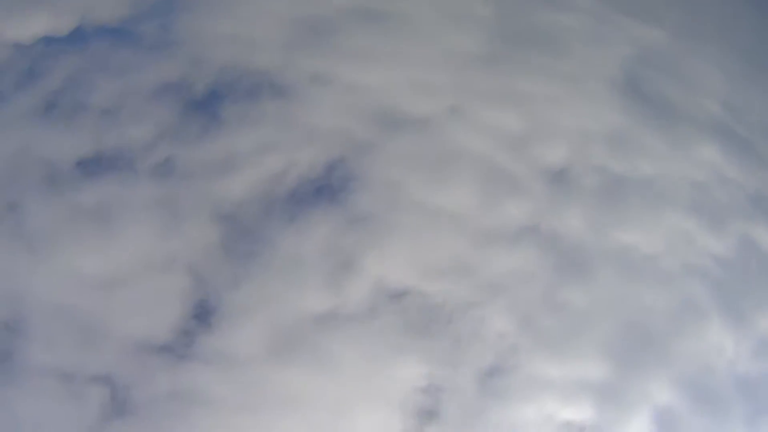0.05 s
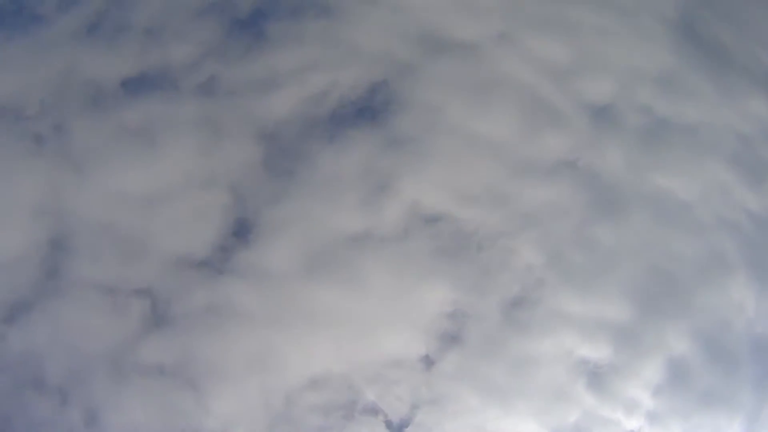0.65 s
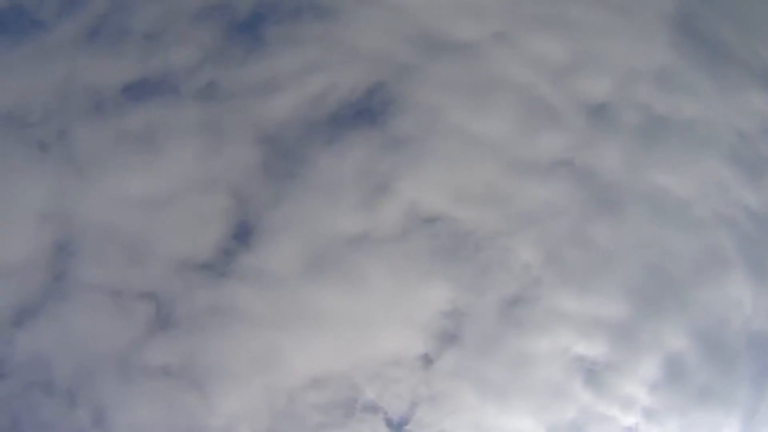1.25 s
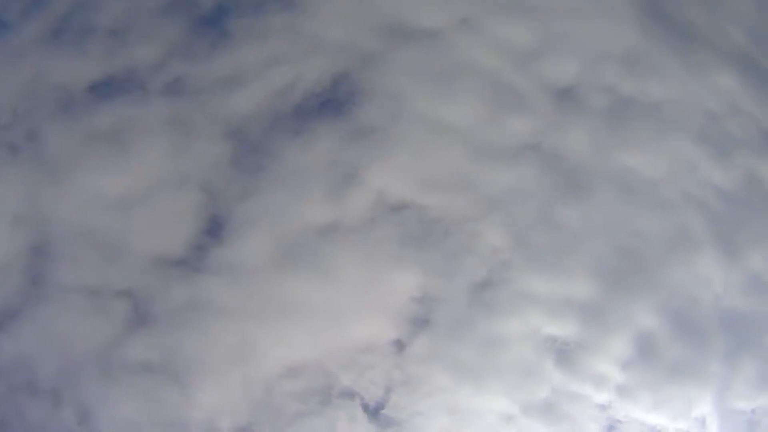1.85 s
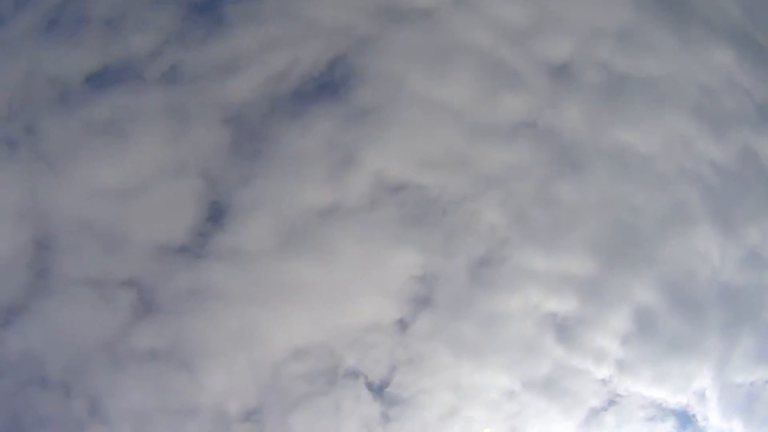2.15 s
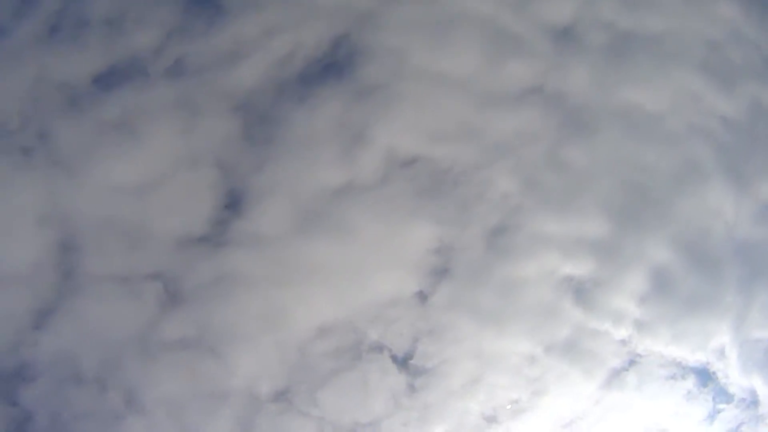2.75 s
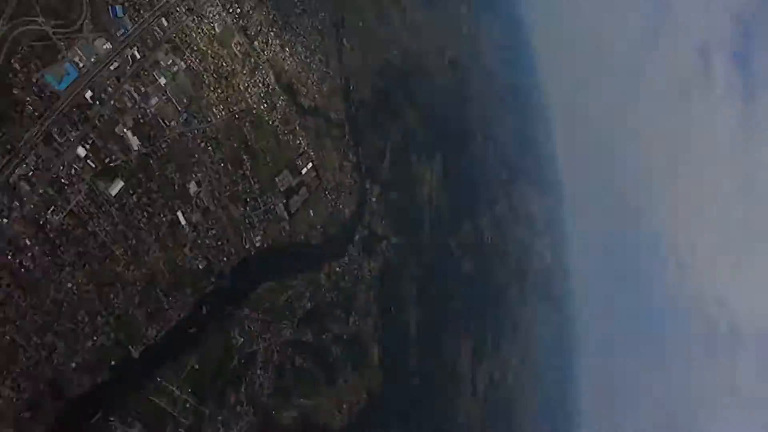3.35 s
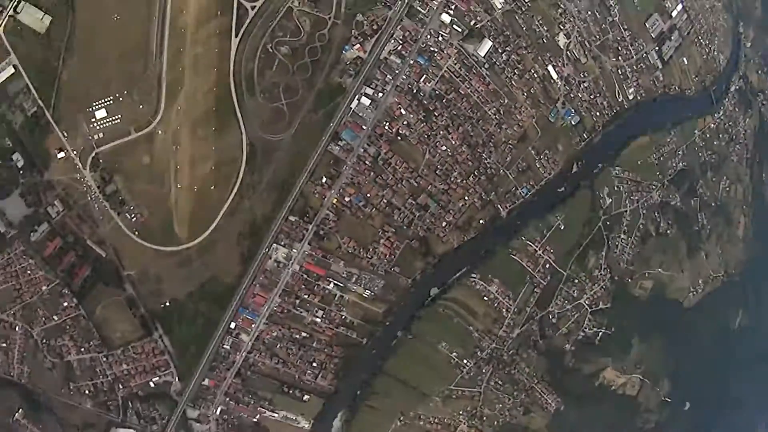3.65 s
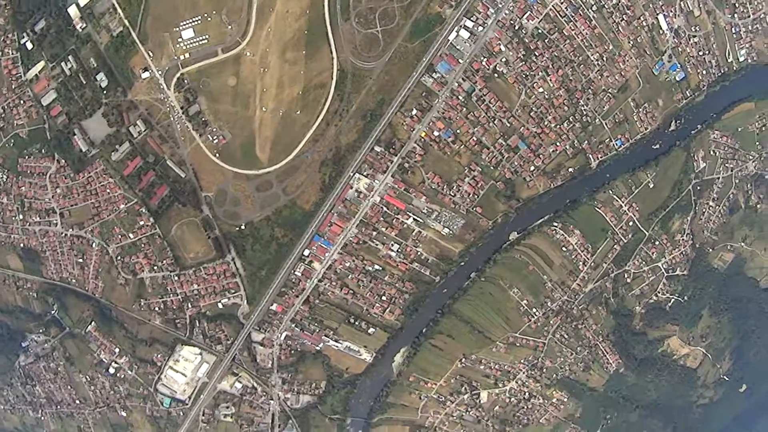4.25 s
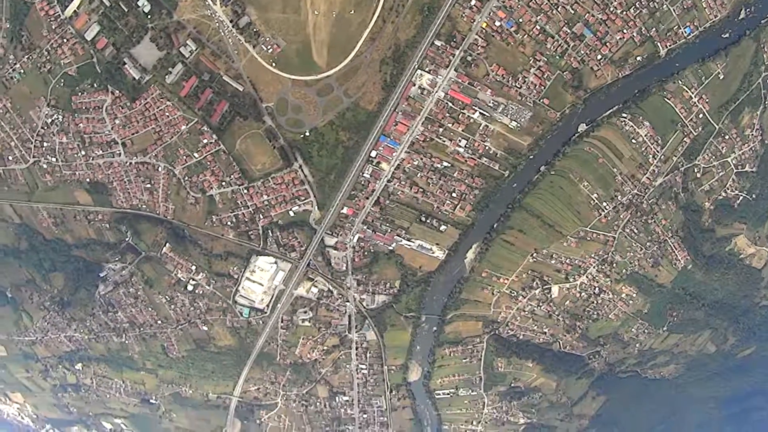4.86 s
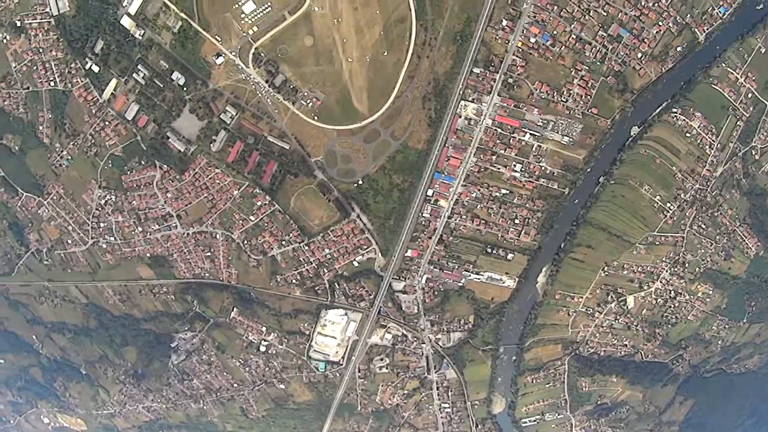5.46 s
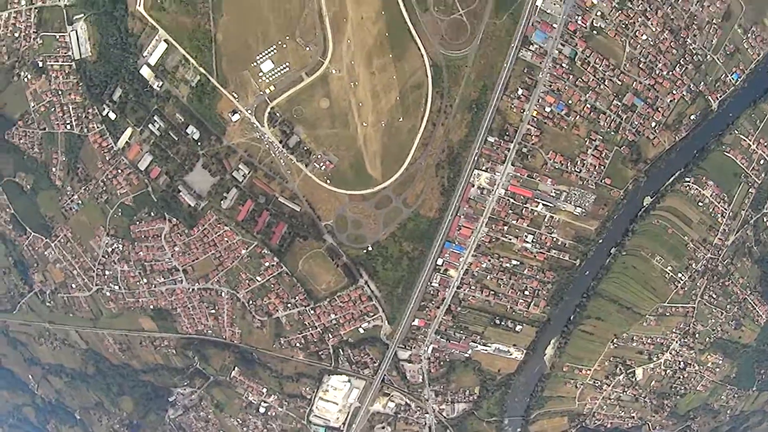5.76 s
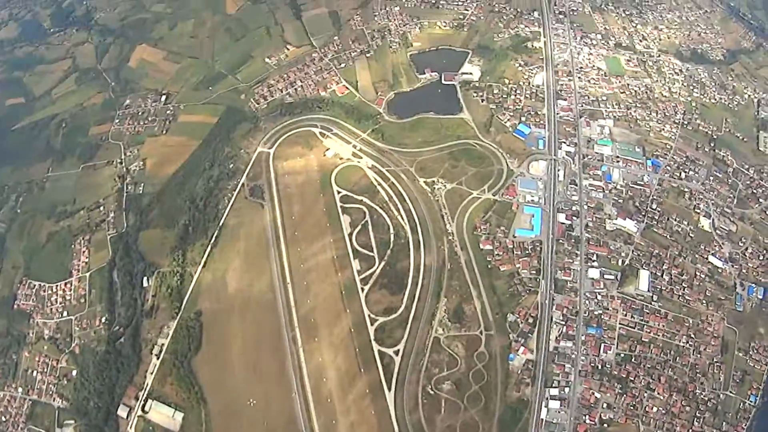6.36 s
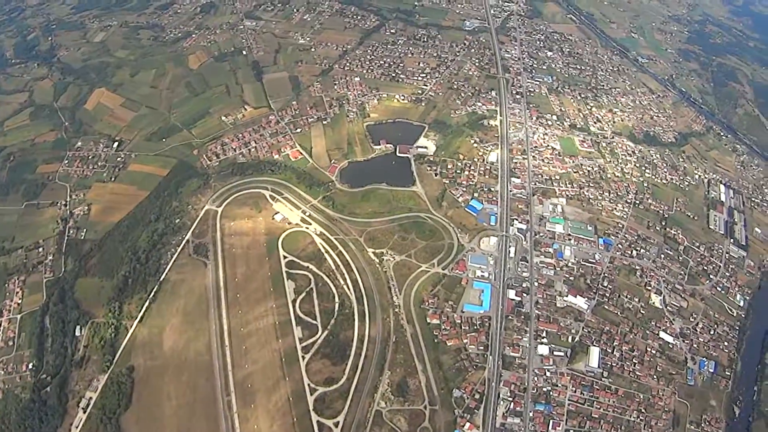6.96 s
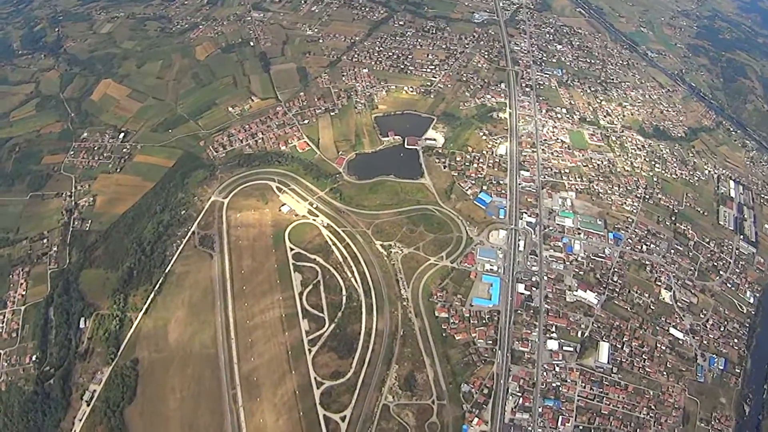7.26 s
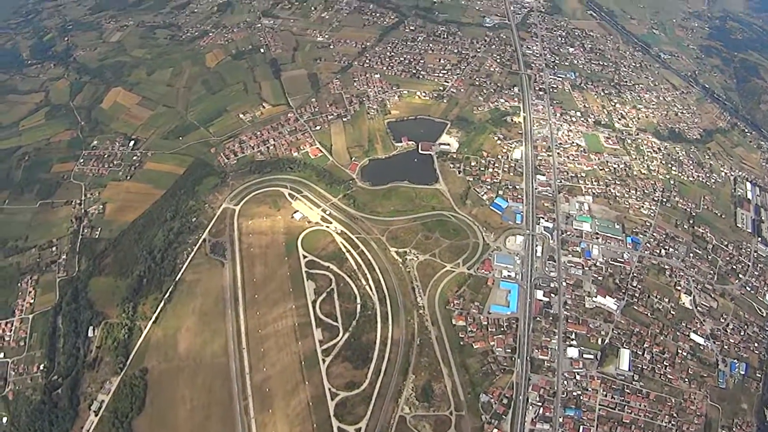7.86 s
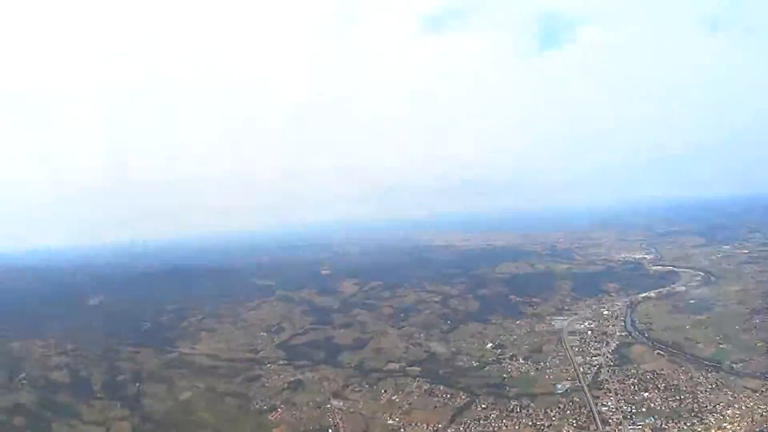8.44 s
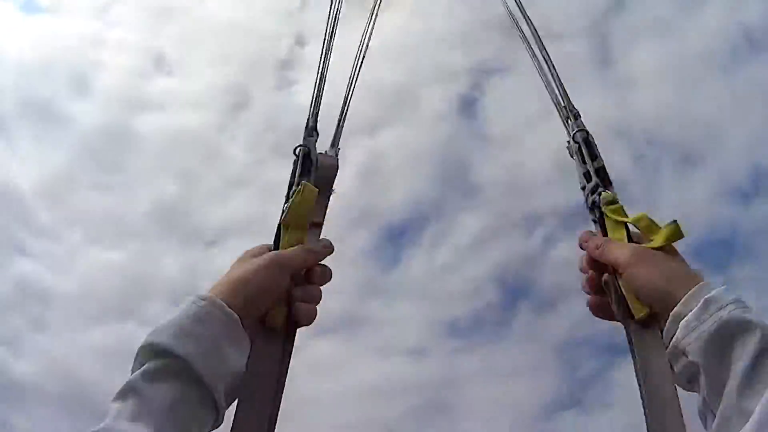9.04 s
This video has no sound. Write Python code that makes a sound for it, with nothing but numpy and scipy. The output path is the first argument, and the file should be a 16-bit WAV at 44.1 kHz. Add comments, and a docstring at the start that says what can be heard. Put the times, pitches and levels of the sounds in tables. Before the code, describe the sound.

Heard from a skydiver's helmet, loud turbulent air rushes past with a steady, airy whistling tone, like breath across a small bottle. A clearer, shrill whistle comes and goes over the roar, strongest at first. After a long stretch of falling, a low surge and a quick cluster of close cracks and thumps mark the parachute opening, and the wind eases into softer, uneven gusts.

```python
"""A shrill whistle over roaring wind: freefall, heard from a camera microphone on the helmet.
Turbulent air roars and hisses over the housing and blows its cavity like a bottle; at times the jet locks
onto an edge in a whistle or a low howl. Then the parachute opens: the hiss dies away, a few hard eddies
slap the microphone point-blank, and a slower, lumpy wind is left."""
import sys
import numpy as np
from scipy import signal
from scipy.fft import rfft, irfft, next_fast_len
from scipy.io import wavfile
from scipy.ndimage import uniform_filter1d

SR = 44100
rng = np.random.default_rng(int(sys.argv[2]) if len(sys.argv) > 2 else 0)


def file_out(sig):
    """Save sig as 16-bit WAV at sys.argv[1]."""
    # one column per channel
    cols = np.atleast_2d(sig).T
    # limit, then scale
    lim = np.clip(cols, -1, 1)
    pcm = np.round(lim * 32767).astype(np.int16)
    wavfile.write(sys.argv[1], SR, pcm)


N = 401300
TIME = np.arange(N) / SR

# Colours of the wind at the microphone. Each row: frequency in Hz, relative density in dB.
BUFFET_COLOUR = [(15, -30), (30, -12), (50, -2), (80, 1), (120, -3.5), (200, -1), (330, -21), (700, -46)]
ROAR_COLOUR = [(100, -23), (200, -1.5), (350, -1.5), (520, 1), (585, -2), (685, 2), (790, -2), (900, -1),
               (1020, 0.5), (1150, -1), (1500, 0.5), (2100, -19), (3500, -18.5), (8000, -43)]
RUSH_COLOUR = [(1300, -15.5), (1850, 5.5), (2150, 2), (2600, 3), (2900, 0), (3250, 0), (3550, -8),
               (3850, -21), (4250, -9), (5000, -18.5), (6500, -32)]
HISS_COLOUR = [(2200, -25.5), (3200, 9), (3800, 0.5), (4230, 6.5), (5100, 3), (5500, 3), (5880, 3),
               (6400, 0.5), (7000, -2), (7600, -1), (8600, -6.5), (9950, -6), (10500, -17), (11200, -36)]
CAVITY_COLOUR = [(1100, -35), (1300, -16.5), (1400, -9), (1490, -2.5), (1600, -1), (1690, 3.5),
                 (1790, -6.5), (1880, -4), (2000, -10.5), (2150, -19.5), (2900, -49)]
# How alike the two microphone ports sound. Each row: frequency in Hz, coherence from 0 to 1.
PORT_LIKENESS = [(30, .92), (90, .9), (250, .72), (430, .8), (700, .6), (1100, .58), (1900, .6),
                 (2400, .38), (3300, .4), (4000, .2), (5500, .5), (7000, .5), (10000, .48)]
# Phase between the ports. Each row: frequency in Hz, lead of the left in radians (negative is late).
PORT_LEAD = [(30, -.12), (90, -.2), (260, -1.3), (450, -1.35), (700, -.9), (1080, -1.7), (1500, -.6),
             (2100, -.6), (2700, -1.8), (3800, -2.4), (5200, -.5), (6500, -1.6), (10000, -1.5)]
# Balance of the ports. Each row: frequency in Hz, left minus right in dB.
PORT_BALANCE = [(60, 2), (89, -0.5), (130, -0.5), (200, -1), (300, -2), (440, 3), (660, 0.0), (980, 0.5),
                (1460, 1.5), (2180, 5), (3250, 2.0), (4850, -0.5), (7220, -1.5), (10800, -2.5)]
# The canopy brakes the fall in two steps. Each row: time in seconds, share of full falling speed.
AIRSPEED = [(8.0, 0.99), (8.12, 0.65), (8.36, 0.52), (8.47, 0.33), (9.1, 0.32)]
# Where the head points. Each row: time in seconds, tilt (0 skyward, about 0.6 groundward, 1 ahead).
HEAD_TILT = [(0, 0.021), (2.2, 0.062), (2.4, 0.35), (3.3, 0.24), (3.55, 0.57), (4.3, 0.63), (5.1, 0.61),
             (6.0, 0.71), (6.4, 1), (7.95, 0.93), (8.15, 0.42), (8.5, 0.046)]
# The microphone in the wake of helmet and body. Each row: time in seconds, depth (0 clean, 1 churned).
BODY_WAKE = [(.15, .07), (1.35, 0.33), (3.05, 0.19), (3.13, 0.13), (3.23, 0.55), (3.47, 0.51),
             (3.57, 0.075), (4.05, 0.024), (5.25, 0.42), (5.8, 0.34), (5.99, .06), (6.3, 0.57),
             (7.86, 0.55), (7.93, 0.88), (8.2, 0.71), (8.44, 1), (8.66, .98), (8.72, 0.63)]
# Spells of rougher air. Each row: start and length in seconds, then lifts in dB of roar, rush, hiss
# and lower hollow.
ROUGH_AIR = [(2.47, 0.64, 5.5, 1, 0.5, -5), (3.189, .09, -3.5, 6.5, -0.5, 4), (3.24, .2, -1, 1.5, 1, -2),
             (3.39, 0.18, 3, 2.5, 0.5, 4.5), (5.65, 0.53, 0.5, 1, 3, -1), (8.06, 0.34, 12.5, -5, 0.5, 12),
             (8.413, 0.23, 3, -2.5, 0, 5.5), (8.592, .08, 3.5, 4, 6, 1)]
# Short gusts while the canopy fills and flies. Each row: time in seconds, lift in dB.
CANOPY_GUSTS = [(8.387, 4.5), (8.411, 7), (8.503, 4), (8.526, -1), (8.755, 6), (8.842, 8.5), (8.875, 5.5),
                (8.982, 3), (9.058, 4.5)]
# Whistles right at the housing. Each row: start, attack, hold and release in seconds, first and last
# pitch in Hz, relative level in dB, left minus right in dB.
EDGE_WHISTLES = [(-.08, .12, 0.23, 0.065, 1830, 1800, -11.5, 2),
                 (.27, 0.045, 0.055, 0.35, 1800, 1765, -13.5, 5),
                 (0.678, 0.054, 0.083, .12, 1745, 1800, -21, 3.5),
                 (.92, 0.11, 0.1135, 0.12, 1785, 1650, -23.5, 6),
                 (1.68, .14, 0.19, 0.26, 1745, 1688, -22.5, 3),
                 (3.007, 0.1, .035, 0.057, 1818, 2034, -10, 8),
                 (3.798, 0.14, 0.12, 0.15, 1499, 1469, -22.5, 2),
                 (5.799, 0.14, 0.11, 0.14, 1623, 1590, -22.5, 2)]
# A lower edge tone. Each row: time in seconds, pitch in Hz, relative level in dB.
EDGE_HOWL = [(2.52, 718, -31), (2.545, 700, -26.5), (2.86, 651, -25), (2.9, 674, -24.5),
             (2.965, 683, -21.5), (2.99, 690, -37)]
# Cloth snaps and hard eddies as the canopy opens. Each row: start in seconds, crack level in dB, pitch
# in Hz, rise in seconds, share of grit, pressure push in dB, push time constant in seconds.
OPENING_SLAPS = [(8.286, -24, 7300, .0004, .5, -40, .001), (8.472, -17, 1500, .0006, .3, -28, .001),
                 (8.55, -16, 1600, .0008, .2, -24, .001), (8.5766, -8, 1350, .0004, .3, -32, .001),
                 (8.598, -12.5, 2900, .0006, .8, -8, .0021), (8.6285, -13, 1700, .0014, .3, -26, .002),
                 (8.6345, -21, 1800, .0009, .8, -10, .0016), (8.6574, -13, 3150, .0008, .7, -8, .0026)]


def wind(whistling, rush_lift_db=0.5, hiss_dip_db=1.5):
    """Turbulent air right on the microphone, bass to treble; the hiss dips under a strong whistle."""
    roar_surge, rush_surge, hiss_surge, hollow_surge = surges()
    rush_lift, hiss_dip = amp(rush_lift_db * whistling), amp(-hiss_dip_db * whistling)
    eddies = churn()
    buffet = blown(level_db=-48.5, wake_db=23, braking_db=-0.5) * turbulence(BUFFET_COLOUR, patchy_db=2)
    roar = blown(level_db=-28.5, wake_db=1, braking_db=5.5)
    roar = roar * roar_surge * turbulence(ROAR_COLOUR, patchy_db=1.5)
    rush = blown(level_db=-26.5, wake_db=-1.5, braking_db=7, facing_db=6, best_tilt=0.96, spread=0.45)
    rush = rush * rush_surge * rush_lift * turbulence(RUSH_COLOUR, patchy_db=0.96)
    hiss = blown(level_db=-31, wake_db=-1, braking_db=13, facing_db=5, best_tilt=0, spread=0.58)
    hiss = hiss * hiss_surge * hiss_dip * turbulence(HISS_COLOUR, patchy_db=0.76)
    ringing = hollows(hollow_surge) + cavity(hiss_dip)
    return buffet + (roar + rush + hiss) * eddies + ringing * eddies ** 0.7


def cavity(overtone_gain, overtone_hz=5010, sag_hz=200):
    """The cavity both ports share, blown at its quarter-wave pitch and near three times that."""
    ring = blown(level_db=-17.5, wake_db=-6.5, braking_db=4, facing_db=4, best_tilt=0.85, spread=0.44)
    ring = ring * turbulence(CAVITY_COLOUR, patchy_db=0.5, likeness=[(1500, 0.97), (2100, 0.95)],
                             lead=[(1400, -0.72), (1900, -0.16)])
    overtone = blown(level_db=-28.5, wake_db=-1, braking_db=11, facing_db=1.5, best_tilt=0, spread=0.19)
    pitch_hz = overtone_hz - sag_hz * over_time(HEAD_TILT)[0]
    return ring + overtone * overtone_gain * resonance(pitch_hz, width_hz=247, left_db=1, lag=0.2)


def whistle(start, attack, hold, release, first_hz, last_hz, level_db, left_db, fade_db=11):
    """The jet catches an edge close by: the whistle swells, holds and fades as its pitch glides."""
    times = start + np.cumsum([0, attack, hold, release])
    pitch_hz = np.interp(times, [times[0], times[-1]], [first_hz, last_hz])
    ends_db = level_db - fade_db
    rows = list(zip(times, pitch_hz, [ends_db, level_db, level_db, ends_db]))
    return edge_tone(rows, jitter_hz=35.6, shake_db=0.7, lock_db=-20.5,
                     gain_db=1.1, left_db=left_db, lag=0.66)


def edge_tone(rows, jitter_hz, shake_db, lock_db, gain_db, left_db, lag):
    """A jet oscillating at an edge: nearly a sine when strong, ragged when it barely locks."""
    pitch_hz, level_db = over_time(rows)
    loose = 1 / (1 + amp(level_db - lock_db) ** 2)
    turns = np.cumsum(pitch_hz + jitter_hz * (0.1 + loose) * wander(rate_hz=92)) / SR
    sounding = (TIME >= rows[0][0]) & (TIME <= rows[-1][0])
    gate = uniform_filter1d(sounding.astype(float), size=600)
    envelope = gate * amp(level_db + gain_db + shake_db * loose * wander(rate_hz=38))
    return envelope * at_ports(np.exp(2j * np.pi * turns), left_db, lag)


def slaps(push_delay_s=0.0014):
    """Each blow cracks across the port, then pushes the membrane in and sucks it back."""
    out, t = np.zeros((2, N)), np.arange(2048) / SR
    hz = np.fft.rfftfreq(len(t), 1 / SR)
    dull = amp(at_hz([(300, -12), (900, 0), (2500, 0), (4000, -10), (8000, -21), (11000, -34)], hz))
    for start_s, crack_db, crack_hz, rise_s, grit, push_db, push_s in OPENING_SLAPS:
        noise = rng.standard_normal(len(t)) + 0.5 * rng.standard_normal((2, len(t)))
        noise = unit(irfft(rfft(noise) * dull))
        envelope = t / rise_s * np.exp(1 - t / rise_s)
        crack = envelope * ((1 - grit / 2) * np.sin(2 * np.pi * crack_hz * t) + grit * noise)
        age = np.maximum(t - push_delay_s, 0) / push_s
        push = age * (1 - age / 2) * np.exp(-age)
        start = round(start_s * SR)
        out[:, start:start + len(t)] += amp(crack_db) * crack + amp(push_db) * push / push.max()
    return out


def hollows(lower_surge):
    """Two low hollows hum behind the roar, each blown hardest at its own tilt of the head."""
    lower = blown(level_db=-41, wake_db=15, braking_db=5, facing_db=4.5, best_tilt=1, spread=0.13)
    lower = lower * lower_surge * resonance(260, width_hz=80, left_db=-1.5, lag=1.3)
    upper = blown(level_db=-34.5, wake_db=6.5, braking_db=5, facing_db=3.5, best_tilt=0.639, spread=0.043)
    return lower + upper * resonance(435, width_hz=70, left_db=2, lag=1.6)


def resonance(centre_hz, width_hz, left_db, lag):
    """Air noise ringing in one hollow: a hump around centre_hz."""
    swirl = unit(wander(width_hz) + 1j * wander(width_hz))
    turns = np.cumsum(centre_hz * np.ones(N)) / SR
    return at_ports(swirl * np.exp(2j * np.pi * turns), left_db, lag)


def turbulence(colour, patchy_db, likeness=PORT_LIKENESS, lead=PORT_LEAD):
    """Noise of one colour at both ports, swelling in short random patches of time and frequency."""
    hz = np.fft.rfftfreq(1024, 1 / SR)
    left_re, left_im, own_re, own_im, patches = rng.standard_normal((5, N // 256 + 5, len(hz)))
    patches = unit(uniform_filter1d(uniform_filter1d(patches, size=10, axis=0), size=14, axis=1))
    shared = at_hz(likeness, hz)
    left = left_re + 1j * left_im
    right = shared * left + np.sqrt(1 - shared ** 2) * (own_re + 1j * own_im)
    right *= np.exp(-1j * at_hz(lead, hz))
    side = amp(at_hz(PORT_BALANCE, hz) / 2)
    in_band = (hz >= colour[0][0]) & (hz <= colour[-1][0])
    frames = np.array([left * side, right / side]) * in_band * amp(at_hz(colour, hz) + patchy_db * patches)
    noise = signal.istft(frames, nperseg=1024, noverlap=768, time_axis=1, freq_axis=2)[1][:, :N]
    return noise / np.std(noise.mean(0))


def blown(level_db, wake_db, braking_db, facing_db=0, best_tilt=0, spread=1):
    """Gain of a layer: it shifts in the wake, loses braking_db as speed halves, and favours one tilt."""
    (speed,), (tilt,), (wake,) = over_time(AIRSPEED), over_time(HEAD_TILT), over_time(BODY_WAKE)
    facing = np.exp(-((tilt - best_tilt) / spread) ** 2)
    return amp(level_db + wake_db * wake + braking_db * np.log2(speed) + facing_db * facing)


def churn(fall_flutter_db=0.89, canopy_flutter_db=2.5, swell_db=0.3, gust_s=0.0058):
    """Gain from passing eddies: a fine shiver at full speed, deep lumps under the canopy."""
    depth_db = np.interp(TIME, [8.1, 8.55], [fall_flutter_db, canopy_flutter_db])
    gusts_db = sum(lift_db * np.exp(-((TIME - s) / gust_s) ** 2) for s, lift_db in CANOPY_GUSTS)
    gain = amp(depth_db * wander(rate_hz=82) + swell_db * wander(rate_hz=13) + gusts_db)
    return gain / np.exp((depth_db * np.log(10) / 20) ** 2)  # the flutter adds no power


def surges(squareness=5):
    """Gains of roar, rush, hiss and lower hollow as rough air swells, holds and passes."""
    lift_db = np.zeros((4, N))
    for start, length, *lifts in ROUGH_AIR:
        lift_db += np.outer(lifts, np.exp(-abs(2 * (TIME - start) / length - 1) ** squareness))
    return amp(lift_db)


def at_ports(wave, left_db, lag):
    """A complex wave in stereo: the left port is left_db louder and lag radians late."""
    left, right = wave.real, (wave * np.exp(1j * lag)).real
    return np.sqrt(2) * np.array([amp(left_db / 2) * left, amp(-left_db / 2) * right])


def wander(rate_hz):
    """Random motion of rms 1, no faster than about rate_hz."""
    size = next_fast_len(N)
    hz = np.fft.rfftfreq(size, 1 / SR)
    return unit(irfft(rfft(rng.standard_normal(size)) / (1 + (hz / rate_hz) ** 2), size)[:N])


def over_time(rows):
    """Each column of a curve table, sample by sample."""
    times, *columns = np.transpose(rows)
    return [np.interp(TIME, times, column) for column in columns]


def at_hz(points, hz):
    """Reads a spectrum on a log-frequency axis."""
    point_hz, value = np.transpose(points)
    return np.interp(np.log(hz + 1), np.log(point_hz + 1), value)


def amp(db):
    """Decibels to gain."""
    return 10 ** (np.asarray(db) / 20)


def unit(x):
    """Scales to rms 1."""
    return x / np.sqrt(np.mean(abs(x) ** 2) + 1e-20)


def scene(full_whistle_db=-10):
    """At the helmet: wind, its edge tones, and the slaps of the opening."""
    whistles = sum(whistle(*row) for row in EDGE_WHISTLES)
    whistling = uniform_filter1d((whistles ** 2).mean(0), size=2000) / amp(full_whistle_db) ** 2
    howl = edge_tone(EDGE_HOWL, jitter_hz=28, shake_db=3, lock_db=-21, gain_db=1.7, left_db=-1, lag=0.64)
    return wind(whistling) + whistles + howl + slaps()


def record(dry, threshold_db=-14, squeeze=0.66, recovery_db_per_s=160, low_cut_hz=34, high_cut_hz=11100):
    """The camera's input: a low cut, a fast limiter that evens out the roar, then a high cut."""
    x = signal.sosfilt(signal.butter(2, low_cut_hz, "highpass", fs=SR, output="sos"), dry)
    power_db = 10 * np.log10(abs(uniform_filter1d((x ** 2).mean(0), size=180)) + 1e-12)
    recovery_db = TIME * recovery_db_per_s
    held_db = np.maximum.accumulate(power_db + recovery_db) - recovery_db
    over_db = np.maximum(held_db - threshold_db, 0)
    x = x / amp(squeeze * uniform_filter1d(over_db, size=100))
    high_cut = signal.firwin(511, high_cut_hz, window=("kaiser", 9), fs=SR)
    return signal.oaconvolve(x, high_cut[None], "same")


dry = scene()
out = record(dry)
file_out(out)
```